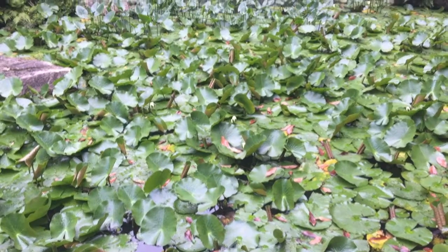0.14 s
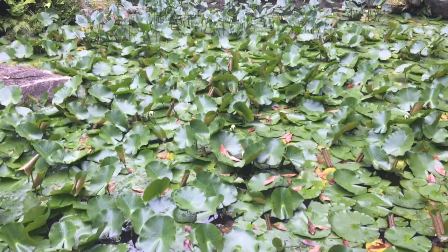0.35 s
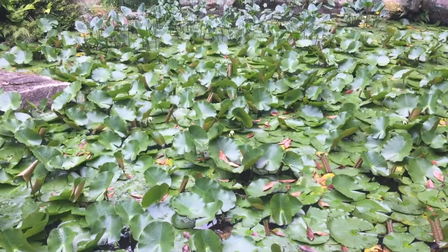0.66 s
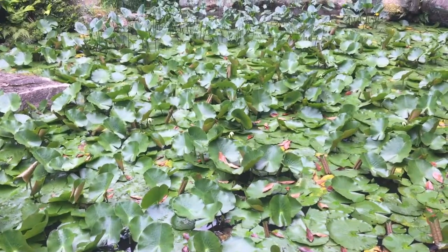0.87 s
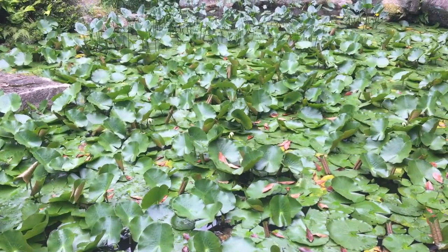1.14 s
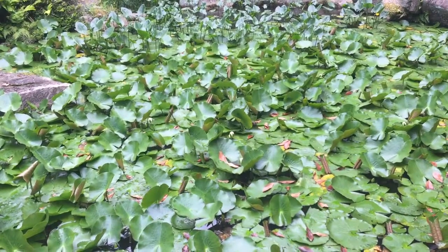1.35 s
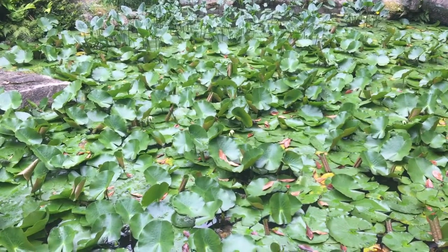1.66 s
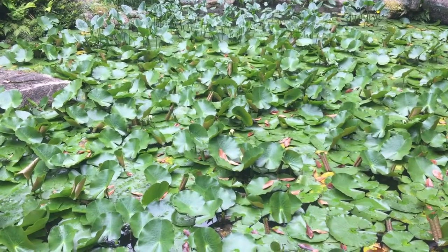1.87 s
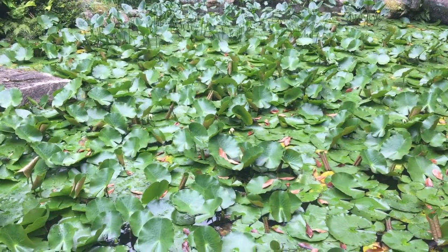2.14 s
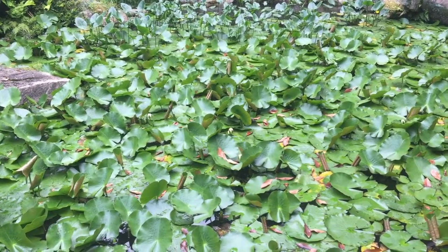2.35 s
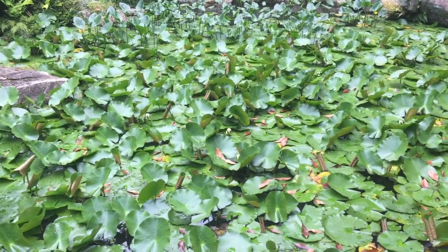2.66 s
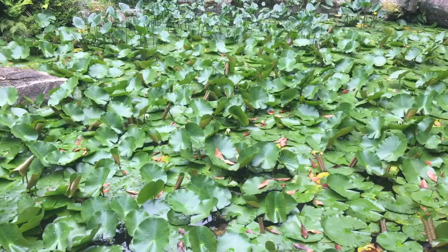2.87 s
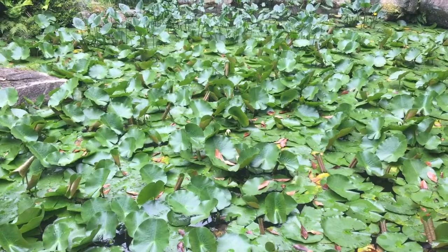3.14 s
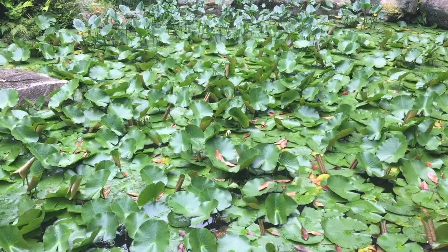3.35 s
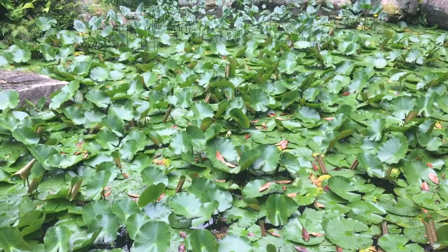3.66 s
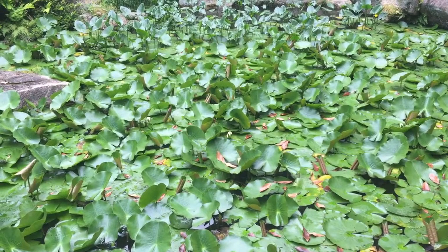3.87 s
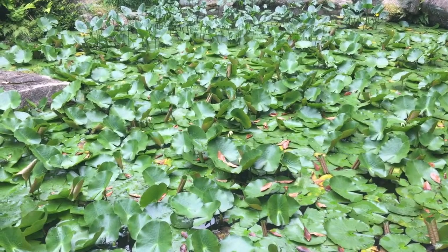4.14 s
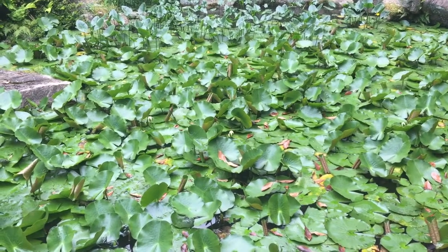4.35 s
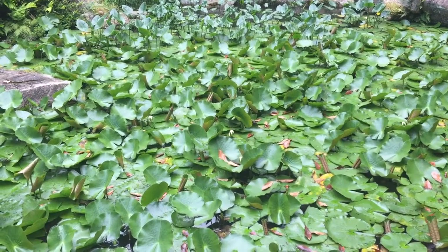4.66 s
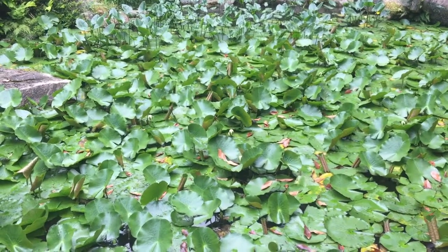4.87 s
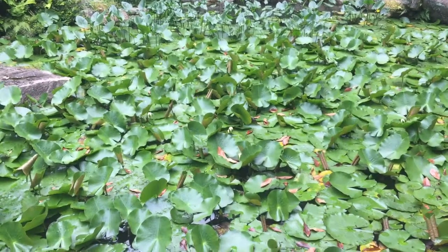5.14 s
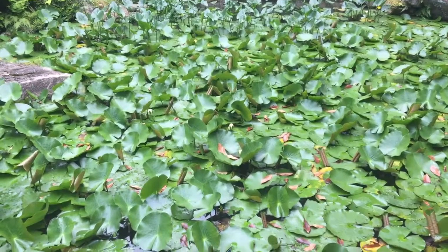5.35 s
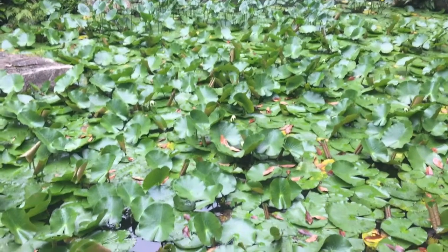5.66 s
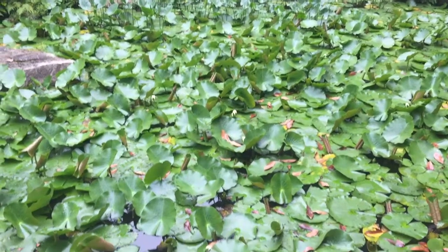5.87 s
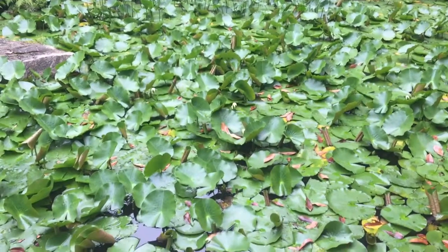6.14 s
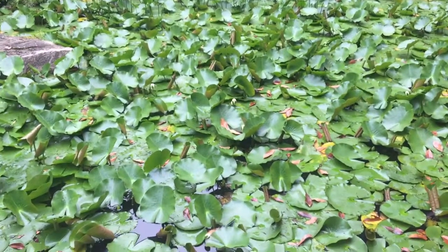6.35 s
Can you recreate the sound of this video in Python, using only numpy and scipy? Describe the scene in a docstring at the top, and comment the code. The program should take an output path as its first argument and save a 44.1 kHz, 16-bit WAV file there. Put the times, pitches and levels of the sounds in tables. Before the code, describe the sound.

A near frog's bright clicking croak alternates with a hollower, farther one, over faint rumble, soft knocks and thin bird whistles.

```python
"""A near frog is croaking as the sound begins, over a faint rumble and hiss; far birds soon chirp and whistle.
A farther frog joins in and the near one answers: each croak is a run of clicks, each click a ringing throat.
Soft knocks, made of fading tones, and a low rustle of filtered noise come in during the second half.
A warbler then holds a thin, nearly pure whistle and ends it with three loud swoops in pitch.
Both frogs croak again near the end, with echoes from the pond around them."""
import sys
import numpy as np
from scipy import signal
from scipy.fft import rfft, irfft
from scipy.io import wavfile
from scipy.ndimage import uniform_filter1d

SR = 44100
rng = np.random.default_rng(int(sys.argv[2]) if len(sys.argv) > 2 else 0)


def materialize(psi):
    """Save the field psi as 16-bit PCM at rate SR to the path in sys.argv[1].

    A 1-D psi becomes a single channel; in a 2-D psi each row is a channel.
    """
    bounded = np.clip(np.atleast_2d(psi).T, -1, 1)
    quanta = np.round(bounded * 32767).astype(np.int16)
    wavfile.write(sys.argv[1], SR, quanta)


N = 286650
TIME = np.arange(N) / SR   # seconds

# tone balance of the outdoor air, only the shape matters: pitch_hz, level_db (per Hz)
AIR_SPECTRUM = [(20, -41.5), (32, -33.5), (45, 0.5), (62, 2.5), (80, -2.5), (120, -6), (170, -12.5),
                (300, -15.5), (550, -21.5), (1200, -22), (3000, -27), (6000, -29.5), (10000, -34.5),
                (15500, -36.5)]
# slow swell of the rumble: time_s, gain_db
RUMBLE_SWELL = [(0, -64.5), (1.3, -66), (2.2, -63), (3.0, -64.5), (3.55, -62.5), (4.2, -65), (4.7, -61),
                (5.2, -61), (5.8, -63.5), (6.5, -64)]
# swell of a soft low rustle close by: time_s, level_db
RUSTLE_SWELL = [(4.45, -103), (4.7, -68), (4.9, -88), (5.12, -61), (5.3, -71.5), (5.45, -81), (5.58, -66.5),
                (5.9, -98), (6.5, -86)]
# soft knocks and the band each one is heard in: start_s, peak_db, lowest_hz, highest_hz
KNOCKS = [(3.632, -59, 250, 404), (4.796, -50, 450, 2500), (4.981, -36, 99, 438), (5.163, -39.5, 900, 4000),
          (5.559, -52, 764, 900), (5.73, -49.5, 300, 870), (6.114, -43, 405, 710)]
# tones that every knock rings with: pitch_hz, level_db (relative), t60_s (time to fade by 60 dB)
KNOCK_TONES = [(176, -6, 0.036), (328, -6.5, 0.035), (507, -1, 0.038), (640, 0, 0.055), (783, -6, 0.046),
               (1127, 0, 0.026), (1630, 1.5, .025)]
# a distant bird's falling chirps: start_s, level_db (before mixing)
CHIRP_STARTS = [(.63, -60), (1.223, -61), (1.774, -60.5), (2.761, -66.5), (3.395, -65), (3.925, -58),
                (4.457, -61.5), (4.985, -58), (5.885, -55.5), (6.183, -54.5)]
# shape of one chirp: time_s (from its start), pitch_hz, level_db (added to the chirp's own)
CHIRP_SHAPE = [(0, 4600, -4.5), (.01, 4230, -6), (.024, 3997, 3), (.036, 3924, -5.5), (.044, 3480, -3.5),
               (.055, 3080, -1)]
# thin whistles of distant birds, one list per whistle: time_s, pitch_hz, level_db (before mixing)
FAR_WHISTLES = [
    [(1.34, 5180, -81), (1.40, 5360, -78), (1.56, 5020, -81), (1.70, 5350, -76), (1.78, 4960, -78)],
    [(3.38, 5300, -75), (3.55, 5400, -78), (3.75, 5630, -72), (3.9, 5000, -69)],
    [(4.02, 3636, -69.5), (4.2, 3540, -69.5), (4.4, 3624, -67.5)],
    [(4.46, 5300, -77), (4.52, 5360, -67.5), (4.64, 5140, -79.5), (4.78, 5180, -73.5)],
    [(4.79, 3420, -79.5), (4.93, 3470, -68.5), (5.04, 3590, -79)],
]
# the warbler's held whistle, a short note and a long one: time_s, pitch_hz, level_db (before mixing)
HELD_NOTES = [
    [(4.45, 2376, -72), (4.46, 2388, -56), (4.496, 2401, -68), (4.508, 2372, -68), (4.58, 2407, -83),
     (4.592, 2383, -57.5), (4.656, 2411, -56.5), (4.67, 2402, -53.5), (4.68, 2412, -66)],
    [(4.68, 2418, -70.5), (4.732, 2374, -56), (4.888, 2371, -46.5), (4.952, 2334, -49),
     (4.974, 2301, -39.5), (4.986, 2239, -57), (4.994, 2258, -40.5), (5.084, 2285, -44), (5.09, 2250, -36)],
]
# the warbler's swoops, with the time of the crest, then how long each later part lasts:
# crest_s, plunge_s, rebound_s, hold_s, first_hz, crest_hz, trough_hz, last_hz, level_db (before mixing)
SWOOPS = [(5.11, 0.035, .020, 0.047, 2600, 3090, 1601, 2055, -34.5),
          (5.284, .046, 0.0031, 0.0025, 2100, 2216, 1230, 1230, -33),
          (5.412, 0.04, 0.049, 0.011, 3290, 5210, 2482, 4350, -33.5)]
# tone balance of each frog's throat and vocal sacs: pitch_hz, level_db (relative)
FAR_THROAT = [(550, -60.5), (850, -20.5), (1220, -9), (1520, -19), (1750, -14), (2100, -23.5),
              (2650, -24.5), (3100, -36.5), (3700, -41), (4350, -35), (7000, -71.5)]
NEAR_THROAT = [(550, -70), (720, -25), (930, -8.5), (1150, -16), (1700, -3.5), (2270, 4), (2650, -8),
               (2930, -7.5), (3250, -16), (3900, -23), (4850, -33.5), (5550, -29.5), (5950, -35.5),
               (9000, -67)]
# reflections off water and leaves around each frog: delay_s, gain (plain factor, minus flips the wave)
FAR_ECHOES = [(.00275, -.27), (.00316, -.35), (.00357, -.29), (.00688, .14), (.0098, .15)]
NEAR_ECHOES = [(.0019, -.52), (.00231, .4), (.00325, -.24), (.00532, .34), (.00759, -.11), (.0106, .12)]
# croaks, runs of clicks on a steady beat that drags at the end: start_s, beats (count), rate_per_s,
# drag_s (delay of the last beat), drag_beats (count over which it builds), level_db, brightness_db (relative)
FAR_CROAKS = [(2.1285, 27, 39.92, .016, 1.6, 1.5, -.5), (3.112, 29, 39.75, .015, 5, 3, .3),
              (5.7727, 28, 39.84, .008, 2.7, 3, .5)]
NEAR_CROAKS = [(-0.2238, 36, 35.64, .0098, .7, 0, 0), (3.5867, 32, 36.87, .0085, 2.9, 0, -.3),
               (5.4073, 35, 35.80, .0065, 1.7, .5, 1)]
# the near frog stutters: beats left out (counted from 0), one row per croak
STUTTERS = [(10, 13), (12, 15, 19, 21), (7, 9, 11, 14, 16, 18, 21, 24)]

# a croak swells: how much softer it starts (dB), time constant (s)
NEAR_SWELL, FAR_SWELL = (10.3, 0.15), (17.3, 0.16)
# it dulls as the air runs out: best brightness (dB), reached this long before the end (s),
# fall-off (dB per s squared), last drop (dB), time constant of that drop (s)
NEAR_BRIGHTNESS, FAR_BRIGHTNESS = (1.63, 0.48, 35, 6.6, 0.044), (0.2, 0.32, 36, 6.2, 0.11)
LAST_CLICK_DB = -1.5   # the last click of a croak is weak
# typical chance differences from click to click
CLICK_JITTER_S, CLICK_SPREAD_DB, BRIGHTNESS_SPREAD_DB = 0.0005, 0.43, 1.14
SWOOP_RISE_S, PLUNGE_SKEW = 0.02, 0.7   # a skew below 1 makes the plunge steepest early
SWOOP_ATTACK_S, SWOOP_RELEASE_S, SWOOP_FADE_DB = 0.014, 0.028, 15
REBOUND_FADE_DB = 2.5   # the voice weakens as it rebounds
BEST_HZ, OFF_BEST_DB = 2100, 8   # the bird is loudest at this pitch; loss per octave squared
CUTOFF_HZ = 15800


def from_db(db):
    """Turn decibels into a plain gain."""
    return 10 ** (np.asarray(db) / 20)


def rms_one(x):
    """Scale a signal so that its average strength (rms) is 1."""
    return x / np.sqrt(np.mean(x ** 2) + 1e-20)


def at_hz(points, hz):
    """Read a spectrum between its points, with pitch spaced in octaves."""
    point_hz, level = np.transpose(points)
    return np.interp(np.log(np.maximum(hz, 1)), np.log(point_hz), level)


def butter(x, hz, kind, order=2):
    """Keep the low, high or middle part of a sound with a smooth (Butterworth) filter."""
    sections = signal.butter(order, np.clip(hz, 10, 0.45 * SR), kind, fs=SR, output="sos")
    return signal.sosfilt(sections, x)


def noise():
    """Even random hiss, as long as the scene."""
    return rng.standard_normal(N)


def convolve(x, response):
    """Let every moment of a sound set off the same pattern of echoes."""
    return signal.fftconvolve(x, response)[:N]


def scatter(t60, onset_s, top_hz, per_s=6000):
    """Small echoes from foliage arrive at random, build up and die away; their total energy is 1."""
    t = TIME[:SR]
    arrivals = rng.choice([-1, 1], SR) * (rng.random(SR) < per_s / SR)
    build_up = 1 - np.exp(-(t / onset_s) ** 2)
    tail = butter(arrivals, top_hz, "low") * from_db(-60 * t / t60) * build_up
    return tail / np.sqrt(np.sum(tail ** 2))


def note(rows, waver, overtone_db, waver_hz=60):
    """A nearly pure bird tone with one overtone follows its pitch and level, slightly unsteady."""
    s, pitch, level = np.transpose(rows)
    unsteady = 1 + waver * rms_one(butter(noise(), waver_hz, "low"))
    phase = 2 * np.pi * np.cumsum(np.interp(TIME, s, pitch) * unsteady) / SR
    swell = from_db(np.interp(TIME, s, level, left=-200, right=-200))
    swell = uniform_filter1d(swell, size=128)   # soft edges
    return np.sqrt(2) * swell * (np.sin(phase) + from_db(overtone_db) * np.sin(2 * phase))


def background(split_hz=500):
    """Shaped noise is split into a slowly swelling rumble and an even hiss."""
    hz = np.arange(N // 2 + 1) * SR / N
    air = rms_one(irfft(rfft(noise()) * from_db(at_hz(AIR_SPECTRUM, hz)), N))
    low = butter(air, split_hz, "low", order=1)
    rumble = low * from_db(np.interp(TIME, *np.transpose(RUMBLE_SWELL)))
    hiss = from_db(-64.5) * (air - low)
    return rumble + hiss


def rustle():
    """Noise in the low middle, unevenly loud, makes a dull rustle."""
    uneven = from_db(4.5 * rms_one(butter(noise(), 25, "low")))
    dull = rms_one(uneven * butter(noise(), [200, 430], "band"))
    return from_db(np.interp(TIME, *np.transpose(RUSTLE_SWELL))) * dull


def knocks():
    """Soft contacts ring a few fading tones, and each knock lets its own band of them be heard."""
    out = np.zeros(N + SR)
    t = TIME[:SR // 4]
    for s, peak_db, low_hz, high_hz in KNOCKS:
        ring = np.zeros(len(t))
        for k, (hz, db, t60) in enumerate(KNOCK_TONES):
            fade = from_db(db + rng.normal(0, 1.0) - 60 * t / t60)
            ring += (-1) ** k * fade * np.sin(2 * np.pi * hz * t)
        ring = butter(butter(ring, high_hz, "low"), low_hz, "high")
        at = int(s * SR)
        out[at:at + len(t)] += from_db(peak_db) * ring / np.abs(ring).max()
    return out[:N]


def far_chirps():
    """Fast, strong pitch waver makes the falling chirps raspy, each a little different."""
    chirps = np.zeros(N)
    for s, level in CHIRP_STARTS:
        # chance changes pitch (Hz) and level (dB), not timing
        chance = rng.standard_normal((len(CHIRP_SHAPE), 3)) * [0, 110, 3]
        rows = np.array(CHIRP_SHAPE) + [s, 0, level] + chance
        chirps += note(rows, waver=0.062, overtone_db=-36, waver_hz=316.0)
    return chirps


def far_whistles():
    """Trembling tones come through in wisps as their loudness flickers."""
    whistles = np.zeros(N)
    for rows in FAR_WHISTLES:
        # the higher a whistle starts, the more it trembles
        tremble = np.interp(rows[0][1], [3500, 5200], [0.008, 0.04])
        whistles += note(rows, waver=tremble, overtone_db=-45, waver_hz=220)
    flicker = from_db(3.6 * rms_one(butter(noise(), 15, "low")))
    return flicker * whistles


def distant_birds():
    """Chirps and whistles are blurred by shorter and longer echoes from the trees."""
    birds = from_db(-2.5) * far_chirps() + from_db(-4.0) * far_whistles()
    short = scatter(t60=0.25, onset_s=0.0047, top_hz=8000)
    long = scatter(t60=1.0, onset_s=0.024, top_hz=7760)
    return from_db(-0.5) * birds + convolve(birds, from_db(-5) * short + from_db(-10.5) * long)


def swoop(crest_s, plunge_s, rebound_s, hold_s, first_hz, crest_hz, trough_hz, last_hz, level_db, count=200):
    """Smooth glides in rows of time_s, pitch_hz, level_db, loudest near the bird's best pitch."""
    t = np.linspace(-SWOOP_RISE_S, plunge_s + rebound_s + hold_s, count)   # 0 at the crest
    rise = np.minimum(t / SWOOP_RISE_S, 0) ** 2
    plunge = np.sin(np.pi / 2 * np.clip(t / plunge_s, 0, 1) ** PLUNGE_SKEW) ** 2
    rebound = np.sin(np.pi / 2 * np.clip((t - plunge_s) / rebound_s, 0, 1)) ** 2
    pitch = crest_hz * (first_hz / crest_hz) ** rise
    pitch = pitch * (trough_hz / crest_hz) ** plunge * (last_hz / trough_hz) ** rebound
    fade_in, fade_out = (t - t[0]) / SWOOP_ATTACK_S, (t[-1] - t) / SWOOP_RELEASE_S
    opening = np.minimum(np.minimum(fade_in, fade_out), 1)
    level = level_db - SWOOP_FADE_DB * (1 - opening) - REBOUND_FADE_DB * rebound
    level = level - OFF_BEST_DB * np.log2(pitch / BEST_HZ) ** 2
    return np.column_stack([crest_s + t, pitch, level])


def warbler():
    """Nearly pure tones hold and swoop, with one distinct echo of the swoops and a ring from the trees."""
    held = from_db(1.6) * sum(note(rows, waver=0.003, overtone_db=-39) for rows in HELD_NOTES)
    swoops = from_db(-1.5) * sum(note(swoop(*row), waver=0.00407, overtone_db=-38.5) for row in SWOOPS)
    echo = from_db(-22.0) * np.interp(TIME - 0.046, TIME, swoops, left=0)
    ring = scatter(t60=0.77, onset_s=0.0035, top_hz=8800, per_s=3300)
    trees = convolve(swoops + from_db(-5.5) * held, ring)
    trees = butter(trees, 2570, "high")   # leaves scatter the high notes best
    return held + swoops + echo + from_db(1.0) * trees


def click_train(start, beats, rate, drag_s, drag_beats, level_db, bright_db, swell, brightness, skipped=()):
    """One croak as rows of time_s, strength_db, brightness_db: it swells, then slows and dulls."""
    soft_db, swell_s = swell
    best_db, best_s, arch_db, drop_db, drop_s = brightness
    beat = np.arange(beats)
    last = beat == beat[-1]
    s = start + beat / rate + drag_s * np.exp((beat - beat[-1]) / drag_beats)
    left = s[-1] - s   # seconds until the last click
    strength = level_db - soft_db * np.exp((start - s) / swell_s) + LAST_CLICK_DB * last
    bright = bright_db + best_db - arch_db * (left - best_s) ** 2 - drop_db * np.exp(-left / drop_s)
    chance = rng.standard_normal((beats, 3)) * [CLICK_JITTER_S, CLICK_SPREAD_DB, BRIGHTNESS_SPREAD_DB]
    rows = np.column_stack([s, strength, bright]) + chance
    return rows[(s >= 0) & ~np.isin(beat, skipped)]


def struck(spectrum_db):
    """The ring of a struck body with this spectrum, starting as promptly as it can (minimum phase)."""
    cepstrum = irfft(np.log(from_db(spectrum_db)))
    half = len(cepstrum) // 2
    # fold the second half onto the first so that nothing sounds before the strike
    cepstrum[1:half] *= 2
    cepstrum[half + 1:] = 0
    return irfft(np.exp(rfft(cepstrum)))


def croaks(clicks, throat, low_hz, high_hz, vary_db, size=2048):
    """Each snap of the larynx rings the throat; a duller snap has weaker upper resonances."""
    hz = np.arange(size // 2 + 1) * SR / size
    upper = at_hz([(low_hz, 0), (high_hz, 1)], hz)   # where brightness acts
    knots = np.geomspace(600, 8000, 16)
    # beyond the ends of the table the throat's response falls away
    below = 20 * np.log10(np.clip(hz / throat[0][0], 1e-2, 1))
    above = 20 * np.log10(np.maximum(hz / throat[-1][0], 1))
    body = at_hz(throat, hz) + below - above
    height = np.abs(struck(body)).max()
    # the upper resonances change most from snap to snap
    change = np.interp(hz, [2700, 5500, 7500], [1, 2.5, 0])
    out = np.zeros(N + size)
    for s, strength_db, bright_db in clicks:
        wobble = np.interp(hz, knots, rng.normal(0, vary_db, len(knots))) * change
        at = max(int(s * SR), 0)
        out[at:at + size] += struck(body + strength_db + bright_db * upper + wobble) / height
    return out[:N]


def over_pond(x, echoes, wash_db, t60, low_hz, top_hz):
    """Add crisp nearby echoes and a grainy wash from leaves and banks that favours the middle range."""
    crisp = sum(gain * np.interp(TIME - delay, TIME, x, left=0) for delay, gain in echoes)
    # swaying leaves keep changing the pattern of the wash, 3 turns a second
    sway = 2 * np.pi * 3 * TIME + rng.uniform(0, 2 * np.pi)
    wash = np.zeros(N)
    for share in (np.cos(sway), np.sin(sway)):
        wash += share * convolve(x, scatter(t60, onset_s=0.0093, top_hz=top_hz, per_s=1600))
    wash = butter(butter(wash, low_hz, "high", order=3), top_hz, "low")
    return x + crisp + from_db(wash_db) * wash


def far_frog():
    """Throat snaps make hollower clicks, about 40 a second, with more of the pond in them."""
    clicks = np.vstack([click_train(*row, FAR_SWELL, FAR_BRIGHTNESS) for row in FAR_CROAKS])
    voice = from_db(-42.5) * croaks(clicks, FAR_THROAT, low_hz=1182, high_hz=2210, vary_db=3.0)
    return over_pond(voice, FAR_ECHOES, wash_db=-6.5, t60=0.19, low_hz=1910, top_hz=3120)


def near_frog():
    """Throat snaps make sharp, bright clicks, about 36 a second, with some beats left out."""
    clicks = np.vstack([click_train(*row, NEAR_SWELL, NEAR_BRIGHTNESS, skipped)
                        for row, skipped in zip(NEAR_CROAKS, STUTTERS)])
    voice = from_db(-26.5) * croaks(clicks, NEAR_THROAT, low_hz=1920, high_hz=2340, vary_db=2.05)
    return over_pond(voice, NEAR_ECHOES, wash_db=-10.0, t60=0.29, low_hz=550, top_hz=2225)


def scene():
    """Add air, rustle, knocks, birds and frogs into one channel."""
    surroundings = background() + rustle() + knocks()
    animals = distant_birds() + warbler() + far_frog() + near_frog()
    return (surroundings + animals)[None]


def record(dry):
    """Cut the very top of the sound steeply."""
    return signal.sosfilt(signal.ellip(10, 0.1, 70, CUTOFF_HZ, fs=SR, output="sos"), dry)


dry = scene()
out = record(dry)
materialize(out)
```